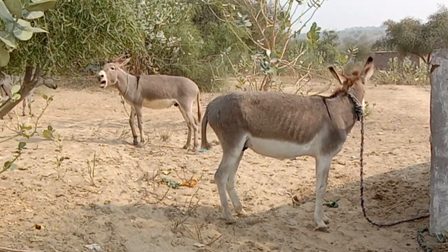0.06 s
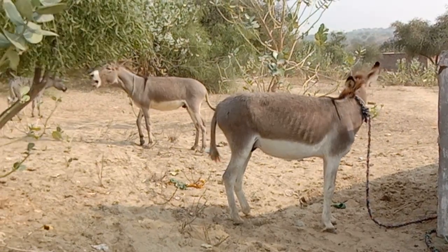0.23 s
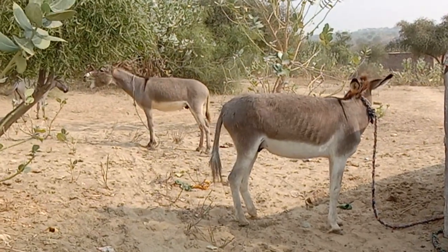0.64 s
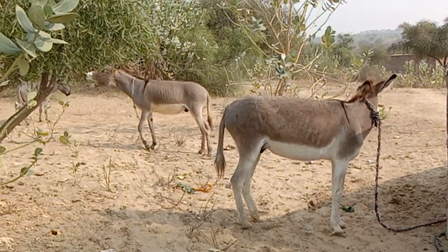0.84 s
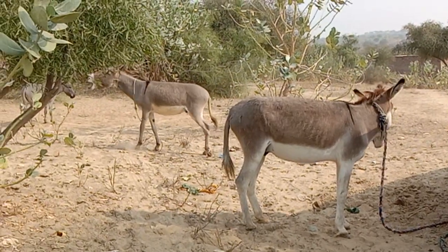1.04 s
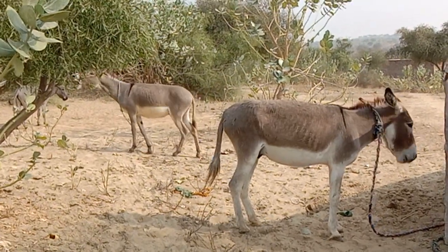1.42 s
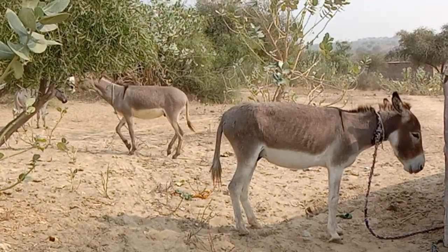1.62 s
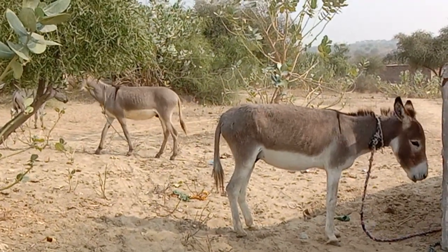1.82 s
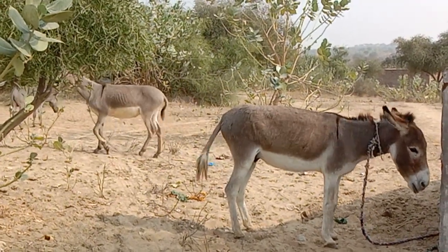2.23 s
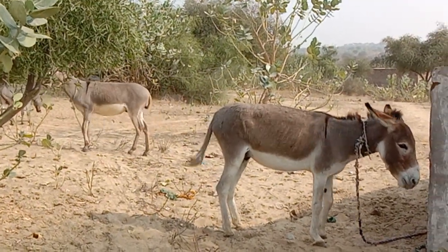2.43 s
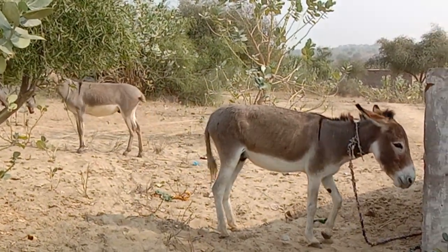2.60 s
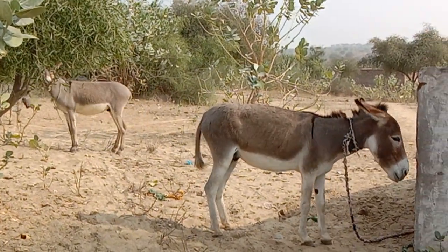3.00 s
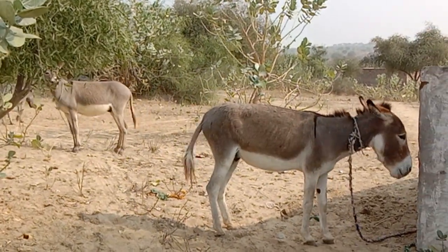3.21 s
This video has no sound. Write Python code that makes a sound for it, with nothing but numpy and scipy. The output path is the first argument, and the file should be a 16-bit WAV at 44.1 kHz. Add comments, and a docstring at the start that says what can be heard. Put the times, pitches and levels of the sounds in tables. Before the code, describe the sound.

A donkey brays loudly, alternating rough honking haws with shrill, wheezy hees.

```python
"""A donkey on open sandy ground draws breath, then brays out and in about twice a second.
Each outward 'haw' is a growl of throat pulses that climbs in pitch; the first five clear into a honk.
Between haws comes an inward 'hee': rushing air with two whistles, one rising to lock on a shrill note,
one falling. Bushes echo faintly throughout. Wind bumps the microphone, hardest over the last two haws,
and a faint breath ends the bray."""
import sys
import numpy as np
from scipy import signal
from scipy.fft import rfft, irfft, next_fast_len
from scipy.io import wavfile
from scipy.ndimage import uniform_filter1d, minimum_filter1d, map_coordinates

SR = 44100
rng = np.random.default_rng(int(sys.argv[2]) if len(sys.argv) > 2 else 0)


def store_pcm(level_fs):
    """Save levels as 16-bit WAV."""
    pcm = np.round(np.clip(level_fs, -1, 1) * 32767).astype(np.int16)
    wavfile.write(sys.argv[1], SR, np.atleast_2d(pcm).T)


N = 147735
T = np.arange(N) / SR

# resonances of the growling throat [f/Hz, gain/dB]
THROAT = [(100, -50.5), (170, -6.5), (280, -1), (350, -8.5), (450, 10.5), (730, -12), (900, -4),
          (1120, 9.5), (1750, -4), (2000, -20.5), (3100, -45.5), (4500, -37.5), (9000, -69.5)]


def haws(first_pitch_ratio=0.62, jitter_cycles=0.1157, scatter_db=3, hum=0.11, doubling=0.092):
    """Source and filter: rough pulses excite the throat, climb through period doubling, lock in a honk."""
    # outward strokes [start t/s, end t/s, growl level/dB, swell/dB, hiss level/dB, top f/Hz]
    strokes = [(0.106, 0.29, -17.5, 1.5, -20, 296.8), (0.614, 0.795, -19, 7, -26.5, 303.3),
               (1.112, 1.28, -19, 9.5, -27, 305), (1.596, 1.743, -19, 5.5, -23.5, 299.8),
               (2.064, 2.222, -18.5, 6.5, -22.5, 289.3), (2.532, 2.693, -19.5, 5, -19, 252),
               (3.007, 3.112, -26, -1.5, -18.5, 285.5)]
    # clear endings of the haws [start t/s, end t/s, level/dB]
    honks = [(0.295, 0.321, -6.5), (0.791, 0.822, -13), (1.273, 1.303, -5), (1.739, 1.76, -3.5),
             (2.207, 2.218, -5.5)]
    # resonances of the honk [f/Hz, gain/dB]
    honk_colour = [(150, -46), (300, -16), (750, -21), (900, -10), (1200, 1), (1900, -13), (3050, -32),
                   (4550, -19), (5300, -50.5), (10000, -88.5)]
    # spectrum of the outward hiss [f/Hz, level/dB]
    hiss_colour = [(800, -17), (1300, 15), (2700, 1.5), (3100, -1.5), (3500, -0.5), (3950, -4), (4600, 9),
                   (6600, 3.5), (7900, -20), (14000, -29.5)]
    growl, hiss = np.zeros((2, N))
    for start, end, db, swell_db, hiss_db, _ in strokes:
        from_middle = ramp(start, end) - .5
        growl += amp(db + swell_db * from_middle) * gate(start, end, 0.011, 0.0093)
        hiss += amp(hiss_db - 7 * (2 * from_middle) ** 2) * gate(start, end, 0.01, 0.021)
    starts, ends, *_, top_hz = np.transpose(strokes)
    current = np.clip(np.searchsorted(starts, T + .1) - 1, 0, None)
    progress = ramp(starts[current], ends[current])
    pitch = top_hz[current] * (1 - (1 - first_pitch_ratio) * (1 - progress) ** 1.8)
    honk = sum(amp(db) * gate(start, end, .007, .009) for start, end, db in honks)
    locked = np.clip(sum(gate(start - .01, end + .1, 0.029, .02) for start, end, _ in honks), 0, 1)
    rough = np.exp(-1.2 * (progress - .5)) * (1 - locked) + 0.033 * locked
    phase = 2 * np.pi * np.cumsum(pitch) / SR
    puffs = unit(rng.standard_normal(N) * (1 + np.cos(phase)) * amp(4 * wobble(170)))
    folds = pulses(pitch, jitter_cycles * rough, scatter_db * rough) + 0.43 * rough * puffs
    chest = hum * (progress * np.cos(phase) + (1 - progress) * np.cos(2 * phase))
    chest += doubling * np.sin(np.pi * progress ** 2) * np.cos(phase * 3 / 2)
    rasp = (hiss + amp(-22) * honk) * unit(noise(hiss_colour) * amp(1.5 * wobble(450)))
    voice = growl * coloured(folds + chest, THROAT) + honk * coloured(folds, honk_colour)
    return voice + rasp + sizzle(hiss, db=-20)


def pulses(hz, jitter_cycles, scatter_db):
    """Jitter and shimmer: the vocal folds give one pulse a cycle, scattered in time and size."""
    cycles = np.cumsum(hz) / SR
    k = np.arange(1, int(cycles[-1]))
    timing, strength = rng.standard_normal((N // 10, 2))[:len(k)].T
    onsets = k + np.interp(k, cycles, jitter_cycles) * timing
    at = np.interp(onsets, cycles, np.arange(N) * (N - 2) / N)
    size = amp(np.interp(k, cycles, scatter_db) * np.clip(strength, -2, 1))
    sample, fraction = at.astype(int), at % 1
    return unit(np.bincount(sample, size * (1 - fraction), N) + np.bincount(sample + 1, size * fraction, N))


def slaps():
    """Impulse response: lone strong pulses ring the throat's resonances."""
    # hard slaps of the throat [t/s, peak level/dB]
    impulses = [(0.087, -24), (1.1895, -12.5), (1.239, -5), (1.699, -1), (1.7082, -3), (2.1256, -4)]
    ring = coloured(np.eye(1, N)[0], THROAT)[:SR // 20]
    hits = np.bincount([round(s * SR) for s, _ in impulses], [amp(db) for _, db in impulses], N)
    return signal.fftconvolve(hits, ring / np.abs(ring).max())[:N]


def hees(squeal_top_hz=5100, shrill_hz=5168, fall_from_hz=2550, glide_s=.027, fall_s=0.017, break_db=6):
    """Flow-driven whistles: one rises, locks and breaks off; one falls through the mouth's resonances."""
    # whistles [start t/s, rise t/s, squeal level/dB, hold end t/s, shrill level/dB, fade/(dB/s),
    # mid-fall t/s, fall end t/s, fall's last f/Hz, fall level/dB, squeal's first f/Hz]
    strokes = [(.402, .042, -18.5, .472, -13, 700, .458, .545, 1200, -16, 4300),
               (.907, .042, -19, 1.04, -10.5, 230, .96, 1.035, 1720, -19.5, 4500),
               (1.393, .055, -17, 1.515, -13, 130, 1.464, 1.515, 1600, -18, 4550),
               (1.84, .038, -16.5, 1.968, -14.5, 190, 1.905, 1.945, 1500, -15, 4300),
               (2.294, .036, -15, 2.39, -20, 500, 2.36, 2.46, 1200, -15, 4300),
               (2.745, .052, -20, 2.82, -35, 500, 2.785, 2.809, 1280, -13, 3800)]
    # mouth resonances acting on the falling whistle [f/Hz, gain/dB]
    mouth = [(1240, -5), (1400, -15), (1620, 5.5), (2100, -7.5)]
    squeal, shrill, fall, high_hz, low_hz = np.zeros((5, N))
    for start, rise, squeal_db, hold, shrill_db, fade, middle, end, last_hz, fall_db, first_hz in strokes:
        squeal += amp(squeal_db) * gate(start, start + rise, 0.0053, 0.0067)
        after = np.maximum(T - hold, 0)
        drop_db = fade * after + break_db * np.tanh(after / 0.002)
        shrill += amp(shrill_db - drop_db) * gate(start + rise, hold + .07, 0.0099, .014)
        fall += amp(fall_db) * gate(start + rise / 2, end, 0.029, 0.017)
        begun = T > start - rise
        rise_left = np.exp(np.minimum((start - T) / glide_s, 0))
        fall_left = (1 - np.tanh((T - middle) / fall_s / 2)) / 2
        high_hz = np.where(begun, squeal_top_hz - (squeal_top_hz - first_hz) * rise_left, high_hz)
        low_hz = np.where(begun, last_hz + (fall_from_hz - last_hz) * fall_left, low_hz)
    fall *= amp(along(mouth, low_hz))
    high_hz += 70 * wobble(420)
    low_hz *= 1 + 0.012 * wobble(300)
    note_hz = shrill_hz + 24 * wobble(150)
    rising = whistle(high_hz, 0.63, 520) + amp(-24.5) * whistle(high_hz * 3 / 2, 0.54, 700)
    flicker = amp(1.9 * wobble(60))
    held = whistle(note_hz, .1, 540) + amp(-44.5) * whistle(2 * note_hz, .6, 360)
    falling = whistle(low_hz, 0.42, 380) + amp(-19.5) * whistle(2 * low_hz, 0.94, 300)
    tones = squeal * rising + shrill * flicker * held + fall * falling
    return tones + sizzle(squeal + shrill / 2, db=-35.5)


def whistle(hz, rough, width_hz):
    """Random modulation spreads a pure tone into narrow-band noise as rough nears 1."""
    grain = np.sqrt(1 - rough) + np.sqrt(rough) * unit(wobble(width_hz) + 1j * wobble(width_hz))
    return np.sqrt(2) * (np.exp(2j * np.pi * np.cumsum(hz + np.zeros(N)) / SR) * grain).real


def inhales():
    """Turbulence: air rushes in through the narrowed throat and slackens."""
    # inward breaths [start t/s, end t/s, level/dB, change over the breath/dB]
    breaths = [(-.02, 0.083, -23.5, -8), (0.405, 0.574, -23.5, -3), (0.907, 1.11, -25, -14.5),
               (1.393, 1.571, -20, -13.5), (1.843, 2.032, -23, -9.5), (2.294, 2.497, -24.5, -3),
               (2.733, 2.941, -23, -6.5), (3.171, 3.26, -45, -4.5)]
    # spectrum of the inrush [f/Hz, level/dB]
    air_colour = [(760, -42), (1250, 9), (2700, 4), (3100, -8.5), (3500, 4), (3950, -8.5), (4600, 13.5),
                  (6700, -3.5), (8200, -24.5), (15000, -51)]
    level = sum(amp(db + change_db * ramp(start, end)) * gate(start, end, 0.011, 0.027)
                for start, end, db, change_db in breaths)
    return level * unit(noise(air_colour) * amp(2.65 * wobble(190)))


def catches(half_s=0.0097, octave_db=-7):
    """The throat catches late in a breath: a brief rough whistle with its second harmonic."""
    # squeaks of the throat [t/s, f/Hz, level/dB]
    squeaks = [(.053, 1330, -24), (.555, 1520, -23)]
    return sum(amp(db) * gate(s - half_s, s + half_s, half_s / 2, half_s / 2)
               * (whistle(hz, 1.0, 400) + amp(octave_db) * whistle(2 * hz, 0.17, 480))
               for s, hz, db in squeaks)


def sizzle(level, db, turn_db_per_s=3):
    """Directivity: the air stream's highest hiss fades as the donkey turns its head away."""
    # spectrum of the highest hiss [f/Hz, level/dB]
    colour = [(3000, -40), (12000, 11)]
    return level * amp(db - turn_db_per_s * T) * noise(colour)


def echo(x, decay_s=.4, low_cut_hz=1300):
    """Scattering from bushes and walls returns an exponentially decaying tail, thin in the bass."""
    tail = rng.standard_normal(SR // 2) * amp(-60 * T[:SR // 2] / decay_s)
    tail = signal.sosfilt(signal.butter(2, low_cut_hz, "high", fs=SR, output="sos"), tail)
    return signal.fftconvolve(x, tail / np.linalg.norm(tail))[:N]


def wind(breeze_db=-54, lumps_db=8.5, flutter_db=-3, floor_db=-63):
    """Turbulent pressure buffets the microphone over the quiet field; hard gusts flutter higher up."""
    # gusts on the microphone [start t/s, end t/s, level/dB]
    buffets = [(0.772, 1.62, -52), (2.32, 2.466, -26.5), (2.537, 2.799, -28.5), (2.819, 3.126, -35),
               (3.288, 3.339, -43.5)]
    # spectra of the wind's rumble, its flutter and the quiet field [f/Hz, level/dB]
    rumble_colour = [(30, -49), (75, -1), (170, -3), (700, -65.5)]
    flutter_colour = [(60, -19), (260, 4.5), (800, -47)]
    field_colour = [(100, -6), (9000, -34)]
    level = amp(breeze_db) + sum(amp(db) * gate(start, end, 0.0026, 0.0024) for start, end, db in buffets)
    lumps = unit(amp(lumps_db * np.minimum(wobble(35), 1)))
    rumble = noise(rumble_colour)
    flutter = amp(flutter_db) * np.sqrt(level / level.max()) * noise(flutter_colour)
    return level * lumps * (rumble + flutter) + amp(floor_db) * noise(field_colour)


def amp(db):
    """Decibels to amplitude ratio."""
    return 10 ** (np.asarray(db) / 20)


def unit(x):
    """Scale to rms 1."""
    return x / np.sqrt(np.mean(np.abs(x) ** 2) + 1e-20)


def along(points, hz):
    """Interpolate (f/Hz, value) points on a logarithmic frequency axis."""
    f, value = np.transpose(points)
    return np.interp(np.log(hz + 1), np.log(f + 1), value)


def wobble(rate):
    """A smooth random curve, rate knots a second."""
    return map_coordinates(rng.standard_normal(N // 4), [T * rate], mode="wrap")


def coloured(x, points):
    """Minimum-phase filtering by a (f/Hz, gain/dB) curve, scaled to rms 1."""
    m = 2 * next_fast_len(N)
    cepstrum = irfft(np.log(amp(along(points, np.fft.rfftfreq(m, 1 / SR)))))
    cepstrum[1:m // 2] *= 2
    cepstrum[m // 2 + 1:] = 0
    return unit(irfft(rfft(x, m) * np.exp(rfft(cepstrum)))[:N])


def noise(points):
    """Filtered white noise of rms 1."""
    return coloured(rng.standard_normal(N), points)


def ramp(start, end):
    """Linear rise from 0 at start to 1 at end."""
    return np.clip((T - start) / (end - start), 0, 1)


def gate(start, end, attack, release):
    """An envelope that opens softly at start and closes at end."""
    return (1 + np.tanh((T - start) / attack)) * (1 - np.tanh((T - end) / release)) / 4


def scene(notch_hz=3086, notch_width_hz=100, notch_db=-10.5, echo_db=-21):
    """Superposition of the bray, with a narrow dip in its spectrum, its faint echo and the wind."""
    bray = haws() + slaps() + inhales() + hees() + catches()
    hz = np.fft.rfftfreq(2 * N, 1 / SR)
    notch = amp(notch_db * np.exp(-((hz - notch_hz) / notch_width_hz) ** 2))
    bray = irfft(rfft(bray, 2 * N) * notch)[:N]
    return (bray + amp(echo_db) * echo(bray) + wind())[None]


def record(dry, ceiling=.75, top_hz=15700):
    """Peak and band limiting: a fast limiter holds down the peaks, then all above top_hz is cut."""
    needed_gain = np.minimum(1, ceiling / (np.abs(dry) + 1e-9))
    limited = dry * uniform_filter1d(minimum_filter1d(needed_gain, size=260), size=260)
    m = next_fast_len(N + SR // 2)
    return irfft(rfft(limited, m) * (np.fft.rfftfreq(m, 1 / SR) < top_hz), m)[..., :N]


dry = scene()
out = record(dry)
store_pcm(out)
```